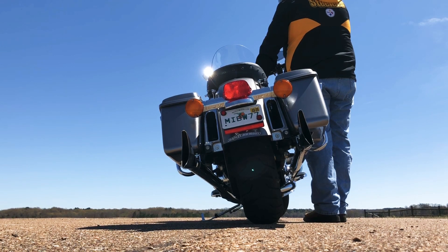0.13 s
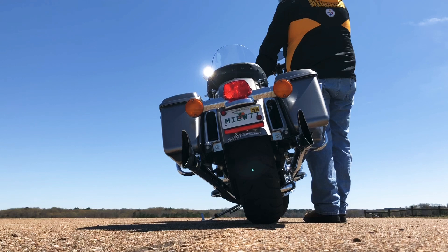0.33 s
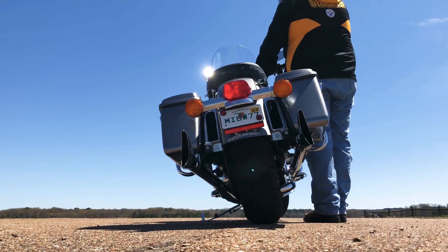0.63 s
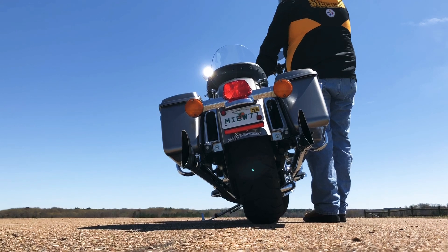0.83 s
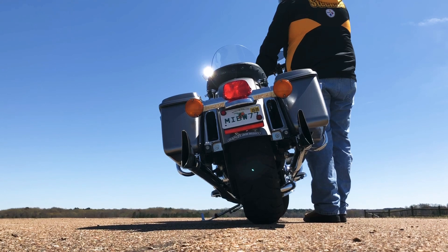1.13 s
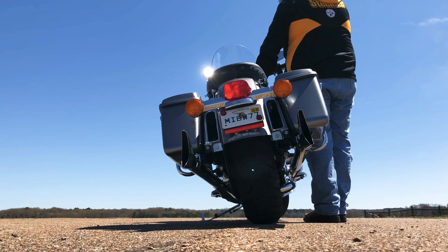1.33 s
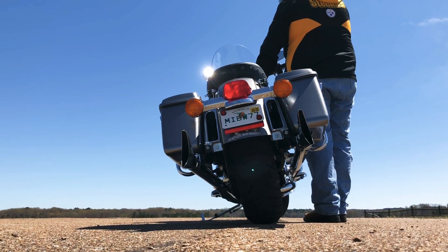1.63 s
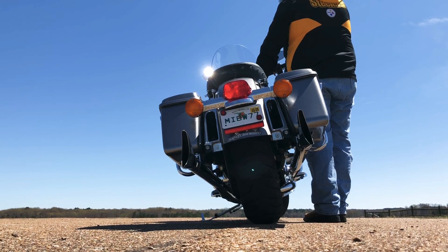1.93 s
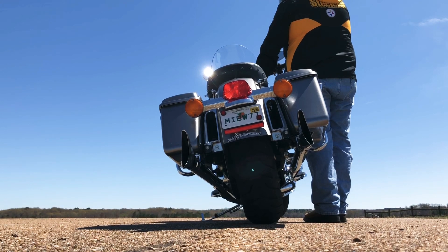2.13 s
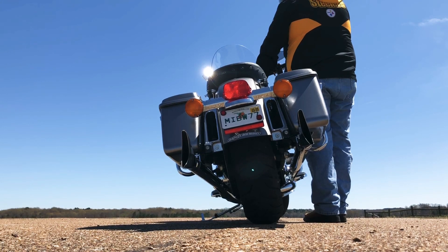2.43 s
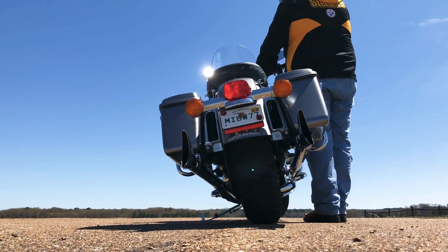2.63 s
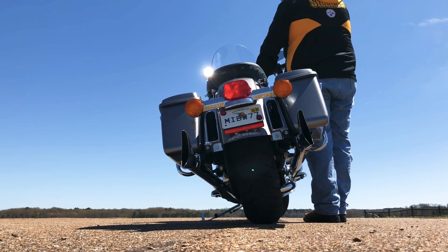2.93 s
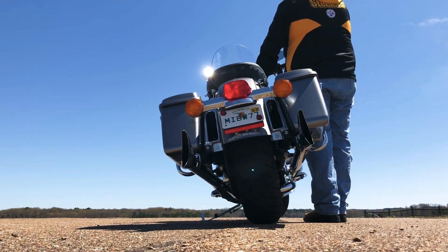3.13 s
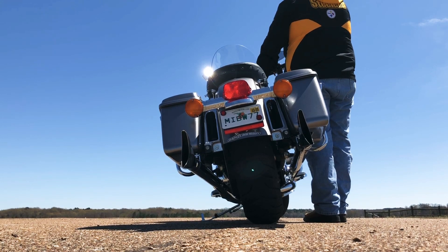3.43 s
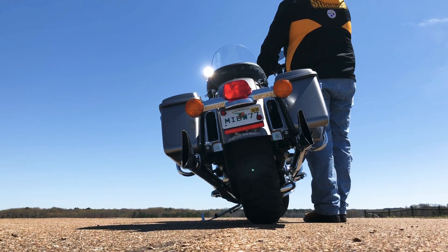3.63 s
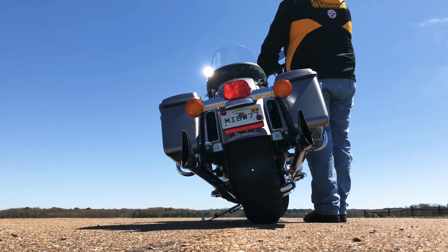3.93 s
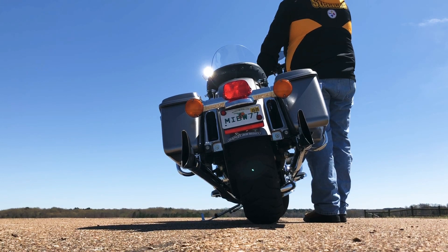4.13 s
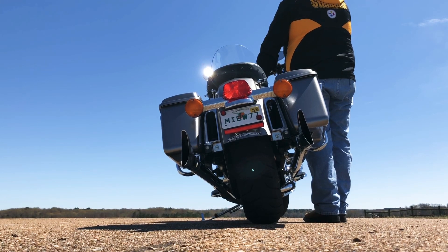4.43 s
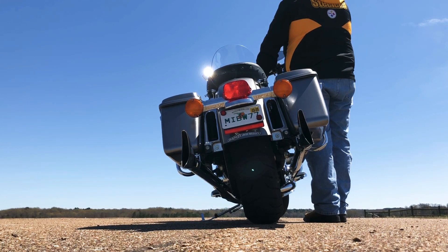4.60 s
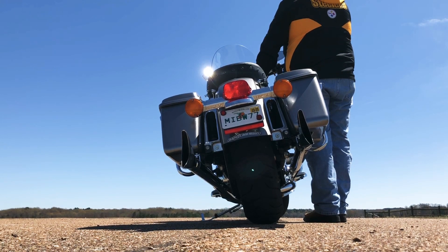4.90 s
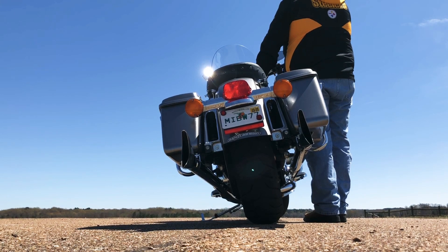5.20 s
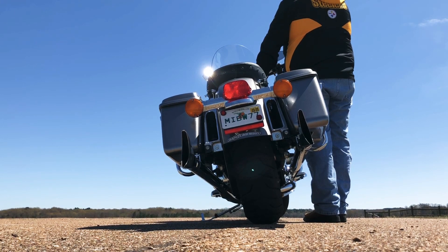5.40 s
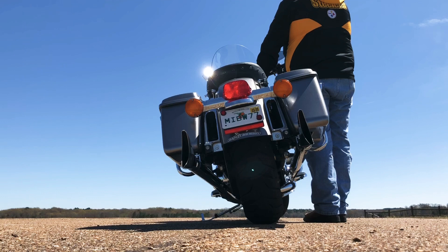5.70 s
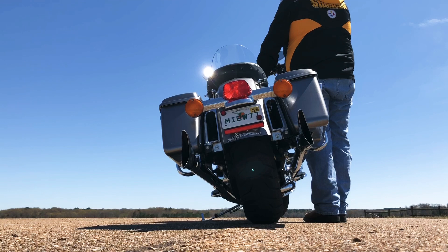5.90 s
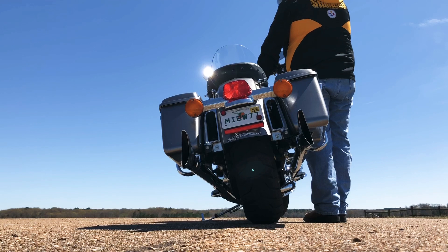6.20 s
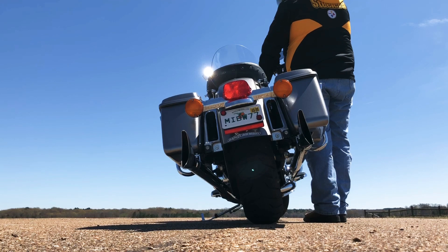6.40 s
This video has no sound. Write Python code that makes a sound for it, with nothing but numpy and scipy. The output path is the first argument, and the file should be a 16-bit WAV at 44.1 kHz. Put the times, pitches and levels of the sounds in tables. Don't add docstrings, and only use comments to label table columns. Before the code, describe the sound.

Close behind a parked twin-cylinder motorcycle outdoors: a short, fierce throttle blip raises a dense, hissing roar, followed by a long gliding fall with sharp, chirpy exhaust crackles. The engine falters into thin ticks and dull puffs, quiet for a moment, then idles in uneven bassy thumps with raspy puffs and faint valve-gear whir. Small pings speckle the idle, which seems to grow louder as automatic gain recovers.

```python
import sys
import numpy as np
from scipy import signal
from scipy.io import wavfile
from scipy.ndimage import uniform_filter1d

SR = 44100
rng = np.random.default_rng(int(sys.argv[2]) if len(sys.argv) > 2 else 0)


def pcm_store(signal):
    levels = np.round(np.clip(np.atleast_2d(signal), -1, 1) * 32767)
    wavfile.write(sys.argv[1], SR, levels.astype(np.int16).T)


def elevation(decibels):
    levels = np.asarray(decibels, float)
    return 10 ** (levels / 20)


N = 288855
T = np.arange(N) / SR

# (time [s], throttle [0-1], share of idle running [0-1], smearing of puffs into flow [0-1])
RIDER = [(0, 0.16, 0.05, 0.18), (.13, 0.07, 0.02, 0.01), (.17, 0.99, 0, 0.04), (.3, 0.99, 0, 0.02),
         (.395, 0.7, 0.01, 0.02), (.425, 0.05, 0.07, 0), (.56, 0.23, 0.14, 0), (.9, 0.11, 0.12, 0.02),
         (1.2, 0.05, 0.08, 0), (1.6, 0, 0.05, 0.09), (1.89, 0, 0.26, 0.63), (2.04, 0, 0.39, 0.1),
         (2.1, 0, 0.69, 0.48), (2.22, 0.5, 0.66, 0.37), (2.5, 0.76, 0.46, 0.8), (2.7, 0, 0.73, 0.32),
         (2.78, 0, 0.73, 0.01), (6.6, 0, 0.82, 0.03)]
# (time [s], speed [cycles/s])
SPEED = [(-.039, 22.777), (.219, 26.447), (.345, 38.937), (.534, 40.429), (1.18, 27.199), (1.914, 14.32),
         (1.956, 12.573), (2.342, 11.172), (2.57, 7.459), (3.005, 8.062), (3.831, 8.156), (4.451, 7.497),
         (5.149, 7.82), (5.601, 7.401), (5.959, 8.043), (6.023, 7.267), (6.198, 7.936), (6.7, 7.485)]
# (time [s], level [dB])
LOUDNESS = [(0, -14.5), (.13, -16), (.22, -18.5), (1.07, -15.5), (1.3, -17.5), (1.6, -20), (1.8, -20),
            (2.03, -23), (2.28, -31), (2.55, -27), (3.4, -23), (4.55, -15), (5.2, -14.5), (6.55, -14.5)]
# (place [cycle], pipe lag [ms], idle [dB], closed throttle [dB], open throttle [dB], pop [dB],
# extra lag of a burnt charge [ms])
PUFFS = [
    (0.00091, 0.5, -4, -11, -2.5, -6.5, 0),
    (.426, -0.88, -9.5, -13.5, 0, 13.5, 2),
    (.2, 11.5, -35.5, -5, -31, -26, -1),
    (.51, 10.5, -58, -2.5, -30, -39, 0),
    (.795, -0.5, -13, -34, -62, 14, 2),
    (0.44, 11.5, -54, -44, -49, -51, 10),
]
# (time [s], change [dB])
ODD_FIRING = [(.078, -28), (.129, -3), (.144, -25), (.182, 1.5), (.205, 2.5), (.243, 2.5), (.297, 22),
              (.315, -6), (.326, 20), (.344, -1), (1.262, 3), (1.291, 1), (1.386, -5), (1.416, -6),
              (1.446, 2), (1.506, 1), (1.518, 5), (1.568, 2), (1.586, -1.5), (1.64, -2), (1.747, 2),
              (1.783, 1), (1.807, 9.5), (1.825, 12.5), (2.793, 3.5), (2.847, 2), (2.921, 3.5), (2.974, 2),
              (3.046, 2.5), (3.265, -3), (3.415, -2.5), (3.662, 1), (3.786, -0.5), (3.838, -1), (4.032, -6),
              (4.083, -8.5), (4.131, -10), (4.214, 2), (4.29, -0.5), (4.345, 2.5), (4.476, 2.5), (4.743, 2),
              (4.817, 0), (5.13, 1.5), (5.204, 1), (5.389, -2.5), (5.436, 0), (5.466, -1), (5.522, 0),
              (5.732, 1.5), (5.788, 0), (5.861, -1.5), (5.911, -11.5), (5.958, -14), (5.987, -15),
              (6.044, -2), (6.222, 2.5), (6.303, 0), (6.379, -4), (6.431, 0.5)]
# (time [s], peak [dB])
STUMBLE_TICKS = [(0.145, -13), (1.8485, -18), (1.8672, -13.5), (1.8864, -12.5), (1.9165, -19),
                 (1.9329, -15), (1.946, -20), (1.956, -23), (1.9818, -21), (2.0026, -23.5), (2.0127, -24),
                 (2.0324, -34), (2.0827, -35), (2.1024, -33), (2.1124, -28), (2.142, -32.5), (2.152, -31),
                 (2.167, -31), (2.178, -29), (2.22, -37), (2.2445, -38), (2.2563, -32.5), (2.297, -44),
                 (2.3155, -44), (2.3397, -42), (2.354, -39), (2.397, -47), (2.417, -58), (2.458, -45),
                 (2.5077, -49), (2.5388, -44), (2.578, -40), (2.625, -36.5), (2.666, -35), (2.6848, -48),
                 (2.7098, -26.5), (2.7596, -36)]
# (start [s], end [s])
STUMBLE_S = (1.84, 2.775)
# (time [s], peak [dB], pitch [Hz])
PINGS = [(1.7046, -11, 1480), (1.7435, -13, 1230), (1.825, -14, 1210), (1.8662, -30, 1700),
         (1.8881, -16, 1960), (1.9195, -27, 1500), (1.948, -23, 1480), (2.0054, -17, 1210),
         (2.0244, -25, 1160), (2.7906, -27, 1560), (2.9178, -21, 1570), (3.7803, -17, 1180),
         (3.9085, -18, 1600), (4.417, -18, 1260), (4.6803, -19, 1700), (4.815, -11.5, 1720),
         (5.3333, -10, 1290), (5.465, -12.5, 1610), (5.596, -11, 1690), (5.8581, -17, 1670),
         (6.117, -12, 1680)]

PUSHES = [
    (-0.005, -0.493, -0.276, 0.419, 0.067, 0.018),
    (0.163, -0.55, 0.465, 0.266, -0.291, -0.03),
    (0.387, -0.427, 0.86, 0.327, 0.38, 0.026),
    (0.438, 0.438, 0.447, -0.307, 0.089, -0.028),
    (0.608, 1.35, 0.478, -0.705, -0.121, -0.009),
    (0.784, -2.11, 0.118, -0.232, -0.076, 0.03),
]
# (frequency [Hz], t60 [s])
PIPE_MODES = [(64.4, .25), (122.4, .55), (164.6, .23), (210.6, .17), (319, .3)]
PIPE_MODE_DB = [0, 0.5, 0.5, 5, 14]
# (frequency [Hz], gain [dB])
HOT_PIPE = [(20, -41), (40, -3), (60, 2.5), (120, 5), (155, 10), (200, -2), (311, 2), (420, -9),
            (520, -8.5), (800, -33)]
# (multiple of cycle rate [-], level [dB])
ORDERS = [(1, 10), (2, 5), (3, 7), (4, 0), (5, 5.5), (6, 2.5), (7, -7), (8, -12), (9, 0), (10, 1),
          (11, 3.5), (12, -13), (13, 6), (14, 2.5), (16, 0.5), (18, -1), (21, 0.5), (24, -17)]
# (time [s], span [s], multiple of cycle rate [-], change [dB])
SWELLS = [(.28, .07, 5, 6), (.44, .04, 5, 5), (.55, .22, 2, -6), (.58, .04, 6, 8), (.57, .06, 8, 10),
          (.825, .05, 9, 10), (.83, .05, 11, 9), (1.02, .17, 5, 7), (.98, .08, 9, 5), (1.13, .04, 8, 13),
          (1.27, .07, 6, 9), (1.29, .05, 12, 8), (.95, .2, 3, 3), (.9, .12, 7, 6), (1.5, .12, 3, -3),
          (1.75, .12, 4, 4), (1.63, .05, 16, 6), (1.78, .15, 18, 5), (1.8, .13, 21, 5), (1.85, .12, 24, 4)]
# (frequency [Hz], width [Hz], level [dB])
CAVITY = [(690, 60, 5.5), (759, 98, 19.5), (1203, 40, 0), (1627, 70, -2.5), (1986, 58, -2), (2360, 61, -4)]

# (frequency [Hz], gain [dB])
IDLE_RASP = [(150, 5), (250, -10), (322, -1), (402, -10), (687, -2.5), (949, -13.5), (2240, -25),
             (2800, -24), (3640, -55), (6160, -120)]
REV_RASP = [(150, 3), (250, -6.5), (312, -6), (400, -4), (602, -4), (1590, -7.5), (2800, -17), (3640, -79),
            (6160, -120)]
# (frequency [Hz], gain [dB])
IDLE_HISS = [(1650, -45), (2800, -7.5), (3150, -18.5), (4090, -11), (4770, -25), (5850, -18), (6920, -24),
             (7550, -20.5), (10800, -22.5), (16000, -25.5)]
REV_HISS = [(1650, -70), (2800, 0), (4700, -7), (5130, -5.5), (6070, -8), (7800, -7), (9500, -9),
            (11300, -8), (15000, -14), (16000, -11)]
# (frequency [Hz], gain [dB])
WHIR = [(2000, -32), (2800, -9.5), (4500, -6.5), (6500, -12.5), (10000, -28), (16000, -39)]
# (idle [dB], per speed doubling [dB], open throttle [dB], smeared [dB])
RASP_LAW = (-8, 5.5, 4, -9.5)
HISS_LAW = (-20, 7, 3.5, -16)
# (idle [dB], off idle [dB], per half doubling of speed above knee [dB], smeared [dB])
WHIR_LAW = (-17, 0, 4, 0)

IDLE_PER_S, KNEE_PER_S = 7.8, 31
PUSH_RISE_S = .0079
PUFF_LEAD_S, CRACK_SHARE = .0019, .5
CHIRP_TOP_HZ, CHIRP_END_HZ, CHIRP_GLIDE_S, CHIRP_FADE_S = 2600, 400, .0017, .006
CHIRP_SHARE, CHIRP_GONE_PER_S, STUMBLE_CHIRP_DB = 1.3, 32, -5
PING_RISE_S, PING_FADE_S, PING_DB = .0012, .0045, -4
ROUGH_DB, ROUGH_TURNS = 1.4, .045
MIC_CUT_HZ, EDGE_HZ = 34, 15900


def column(table, index):
    return np.interp(T, np.transpose(table)[0], np.transpose(table)[index])


def steady(x):
    power = uniform_filter1d(uniform_filter1d(x ** 2, size=11400), size=5700)
    return x / np.sqrt(power + 1e-14)


def coloured(x, points):
    f, db = np.transpose(points)
    hz = abs(np.fft.fftfreq(2 ** 14, 1 / SR))
    log_gain = np.log(elevation(np.interp(np.log(hz + 1), np.log(f), db, -90, -90)))
    taps = np.fft.ifft(np.exp(np.conj(signal.hilbert(log_gain)))).real[:2 ** 12]
    return signal.oaconvolve(x, taps)[:N]


def idle_to_rev(drive, idle, idle_curve, rev_curve):
    return idle * steady(coloured(drive, idle_curve)) + (1 - idle) * steady(coloured(drive, rev_curve))


def clicks(times, sizes):
    out = np.zeros(N)
    inside = (times >= 0) & (times < T[-1])
    np.add.at(out, (times[inside] * SR).astype(int), sizes[inside])
    return out


def crackly(spread_db):
    eddies = uniform_filter1d(rng.standard_normal(N), size=30) * np.sqrt(30)
    return rng.standard_normal(N) * elevation(spread_db * eddies)


def patchy(x, patchy_db, tilt_db):
    z = signal.stft(x, nperseg=2 ** 8)[2]
    field = rng.standard_normal(z.shape[::-1]).T
    slope = np.linspace(-.5, 1, len(z))[:, None] * uniform_filter1d(field[0], size=8) * np.sqrt(8)
    field = uniform_filter1d(uniform_filter1d(field, size=7, axis=0), size=8, axis=1) * np.sqrt(56)
    return signal.istft(z * elevation(patchy_db * field + tilt_db * slope), nperseg=2 ** 8)[1][:N]


def cycle_times():
    s = np.arange(SPEED[0][0], SPEED[-1][0], 1 / 2000)
    done = np.cumsum(np.interp(s, *np.transpose(SPEED))) / 2000
    starts = np.interp(np.arange(int(done[-1]) + 1), done - done[0], s)
    return starts[:-1], np.diff(starts)


def puff_trains():
    start, length = cycle_times()
    place, lag_ms, idle_db, shut_db, open_db, pop_db, burn_ms = np.transpose(PUFFS)[..., None]
    at = start + place * length + lag_ms / 1e3
    throttle, idle = (np.interp(at, T, column(RIDER, index=k)) for k in (1, 2))
    chance = rng.standard_normal((len(start), len(PUFFS), 2)).T

    level_db = idle * idle_db + (1 - idle) * (shut_db + throttle * (open_db - shut_db))
    level_db = level_db + chance[0] * .7
    odd_db = sum(db * (abs(at - s) < .007) for s, db in ODD_FIRING)
    odd_db = odd_db - 90 * (at > STUMBLE_S[0]) * (at < STUMBLE_S[1])
    at = at + .0006 * chance[1] - PUFF_LEAD_S * (1 - idle) + burn_ms / 1e3 * np.maximum(throttle, idle)
    size = elevation(level_db + odd_db)
    pop_level_db = (level_db - .5 * chance[0]) * (4.0 - idle)
    pop = elevation(pop_level_db + 2.0 * odd_db + pop_db * idle + chance[1])

    tick_s, tick_db = np.transpose(STUMBLE_TICKS)
    tick = elevation(tick_db - np.interp(tick_s, *np.transpose(LOUDNESS)) - 5.5)
    return np.append(at, tick_s + .00303), np.append(size, tick), np.append(pop, elevation(-13) * tick)


def flow(train, rise_ms, fall_ms, tail_db, tail_ms):
    ms = np.arange(-900, 3600) / SR * 1e3
    bell = np.exp(-(ms / np.where(ms < 0, rise_ms, fall_ms)) ** 2)
    leak = elevation(tail_db) * np.exp(-abs(ms) / tail_ms) * (ms > 0)
    return signal.oaconvolve(train, bell + leak)[900:N + 900]


def gas_speed(train, throttle, idle, smear):
    slow = flow(train, rise_ms=2.4, fall_ms=5.5, tail_db=-17.0, tail_ms=19.0)
    quick = flow(train, rise_ms=.21, fall_ms=.71, tail_db=3.0, tail_ms=2.33)
    burnt = flow(train, rise_ms=.47, fall_ms=3.5, tail_db=-35, tail_ms=3.7)
    thin = flow(train, rise_ms=1.3, fall_ms=2.4, tail_db=-22, tail_ms=10)
    smeared = flow(train, rise_ms=4.5, fall_ms=9.8, tail_db=-6.0, tail_ms=23)
    gas = idle * slow + (1 - idle) * ((1 - throttle) * quick + throttle * burnt)
    gas = np.where((T > 2.06) & (T < STUMBLE_S[1]), thin, gas)
    return (1 - smear) * gas + smear * .43 * smeared


def brightness(law, throttle, smear):
    idle_db, speed_db, open_db, smear_db = law
    doublings = np.log2(column(SPEED, index=1) / IDLE_PER_S)
    return elevation(idle_db + speed_db * doublings + open_db * throttle + smear_db * smear)


def whir(idle, smear, throttle):
    idle_db, off_db, speed_db, smear_db = WHIR_LAW
    doublings = np.log2(np.maximum(column(SPEED, index=1) / KNEE_PER_S, 1))
    level_db = idle_db + off_db * (1 - idle) + smear_db * smear + speed_db * 2 * (1 - throttle) * doublings
    return elevation(level_db) * steady(coloured(crackly(2.6), WHIR))


def pings():
    out, t = np.zeros(N), T[:1200]
    for s, db, hz in PINGS:
        ring = np.tanh(t / PING_RISE_S) * np.exp(-t / PING_FADE_S) * np.sin(2 * np.pi * hz * t)
        part = out[round(s * SR):][:len(t)]
        part += elevation(db + PING_DB) * ring
    return out


def hiss(idle, gas, train, smear, throttle):
    drive = patchy(crackly(1.9) * (gas + elevation(-40)), patchy_db=2.6, tilt_db=3.5)
    jet = idle_to_rev(drive, idle, IDLE_HISS, REV_HISS)
    fast = np.clip(column(SPEED, index=1) / 24, 0, 1) ** 2
    crack = CRACK_SHARE * (1 - idle) * fast * steady(coloured(train, REV_HISS))
    return steady(jet + crack + whir(idle, smear, throttle))


def chirps(at, size):
    t = T[:900]
    hz = CHIRP_END_HZ + (CHIRP_TOP_HZ - CHIRP_END_HZ) * np.exp(-t / CHIRP_GLIDE_S)
    pop = np.minimum(t * 2000, 1) * np.exp(-t / CHIRP_FADE_S) * np.sin(2 * np.pi * np.cumsum(hz) / SR)
    slowness = np.clip(1 - column(SPEED, index=1) / CHIRP_GONE_PER_S, .05, 1)
    uneven_db = 1.4 * rng.standard_normal(len(size)) + STUMBLE_CHIRP_DB * (at > STUMBLE_S[0])
    train = clicks(at - .0012, size * elevation(uneven_db))
    return -CHIRP_SHARE * 2 * slowness * steady(signal.oaconvolve(train, pop)[:N])


def cavity_pops(at, pop):
    t = T[:900]
    knock = sum(elevation(db) * np.exp(-np.pi * width * t) * np.sin(2 * np.pi * hz * t + .18)
                for hz, width, db in CAVITY)
    return signal.oaconvolve(clicks(at - .0036, pop), knock)[:N]


def rasp(at, size, pop, idle, gas):
    drive = crackly(1.9) * (gas + elevation(-2.5 - 4.64 * (3.0 - idle)))
    noise = idle_to_rev(drive, idle, IDLE_RASP, REV_RASP)
    pops = .7 * idle * steady(cavity_pops(at, pop))
    fronts = .13 * steady(coloured(clicks(at, size), REV_RASP))
    return steady(noise + pops + (1 - idle) * (fronts + (1 - idle) * chirps(at, size)))


def orders():
    start, length = cycle_times()
    speed = uniform_filter1d(np.interp(T, start + length / 2, 1 / length), size=2000)
    turns, out = np.cumsum(speed) / SR, 0
    for multiple, db in ORDERS:
        waver = np.interp(T, start, rng.standard_normal(len(start)))
        waver = waver * np.clip(speed / KNEE_PER_S, .8, 2) ** 2
        swell_db = sum(gain_db * np.exp(-((T - s) / span) ** 2)
                       for s, span, k, gain_db in SWELLS if round(k) == round(multiple))
        phase = round(multiple) * turns + rng.random() + ROUGH_TURNS * waver
        out = out + elevation(db + swell_db + ROUGH_DB * waver) * np.sin(2 * np.pi * phase)
    return coloured(out, HOT_PIPE)


def cool_pipe():
    start, length = cycle_times()
    place, *pushes = np.transpose(PUSHES)[..., None]
    vary = elevation(.5 * rng.standard_normal((len(start), len(PUSHES))).T)
    times = (start + place * length).ravel()
    t, out = T[:SR // 2], 0
    for push, db, (hz, t60) in zip(pushes, PIPE_MODE_DB, PIPE_MODES):
        train = clicks(times, (push * vary).ravel())
        mode = elevation(db - 60 * t / t60) * np.sin(2 * np.pi * hz * t) * np.tanh(t / PUSH_RISE_S)
        out = out + signal.oaconvolve(train, mode)[:N]
    return out


def hot_pipe(at, size):
    thumps = steady(coloured(clicks(at, size), HOT_PIPE))
    rumble = steady(coloured(crackly(0), HOT_PIPE))
    return steady(orders()) + .25 * thumps + .16 * rumble


def boom(at, size, idle):
    slow = np.clip(2 - column(SPEED, index=1) / 15, 0, 1)
    cool_share = .1 + .6 * idle + .24 * slow + .12 * np.clip(5 * idle - 3, 0, 1)
    return steady(cool_share * steady(cool_pipe()) + (1 - cool_share) * hot_pipe(at, size))


def scene():
    at, size, pop = puff_trains()
    throttle, idle = column(RIDER, index=1), column(RIDER, index=2)
    smear = np.clip(column(RIDER, index=3), 0, 1)
    train = clicks(at, size)
    gas = gas_speed(train, throttle, idle, smear)
    size, pop = (v * (1 - .15 * np.interp(at, T, smear)) for v in (size, pop))
    pipes = brightness(HISS_LAW, throttle, smear) * hiss(idle, gas, train, smear, throttle)
    pipes = pipes + brightness(RASP_LAW, throttle, smear) * rasp(at, size, pop, idle, gas)
    pipes = pipes + boom(at, size, idle)
    return (elevation(column(LOUDNESS, index=1)) * pipes + pings())[None]


def roll_off(x):
    return signal.sosfilt(signal.butter(12, 17000, fs=SR, output="sos"), x)


def record(dry):
    dry = signal.filtfilt(*signal.butter(2, MIC_CUT_HZ, "high", fs=SR), dry)
    limited = dry / (1 + abs(dry) ** 6) ** (1 / 6)
    edge = signal.firwin(255, EDGE_HZ, window=("kaiser", 5), fs=SR)[None]
    mix = signal.oaconvolve(limited, edge, "same")
    return roll_off(mix)


dry = scene()
out = record(dry)
pcm_store(out)
```